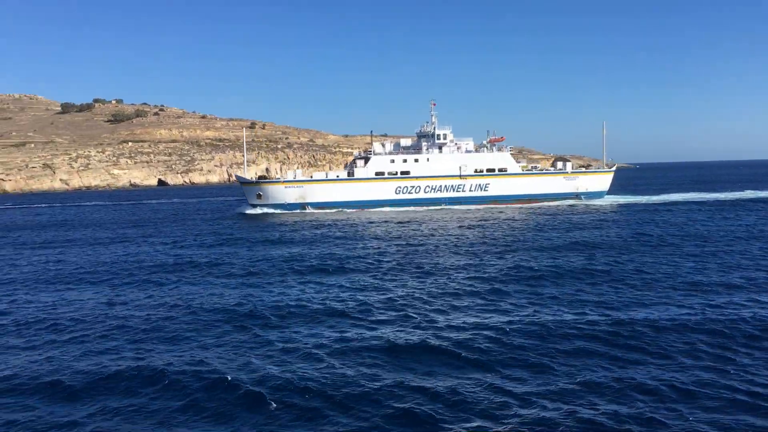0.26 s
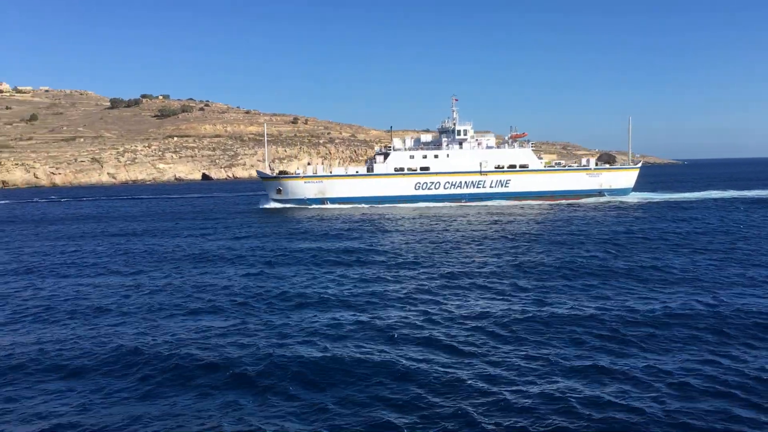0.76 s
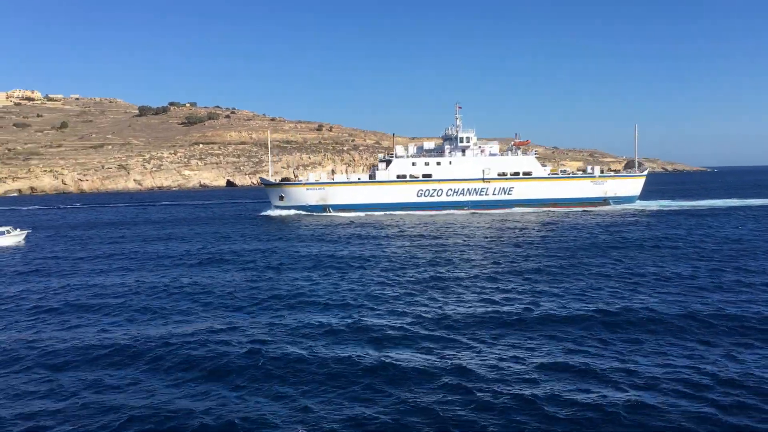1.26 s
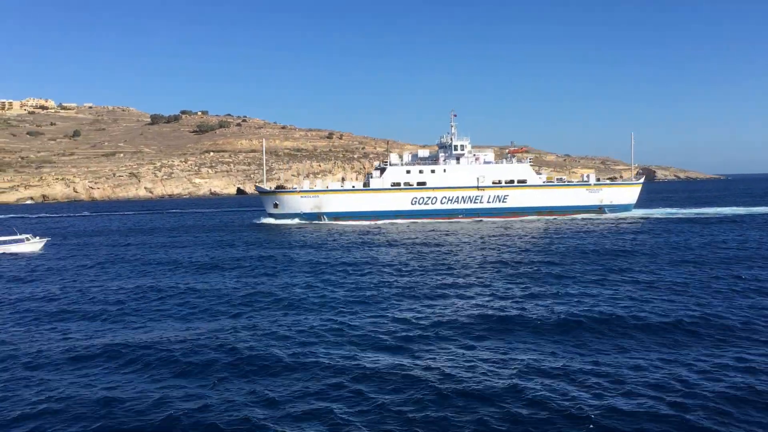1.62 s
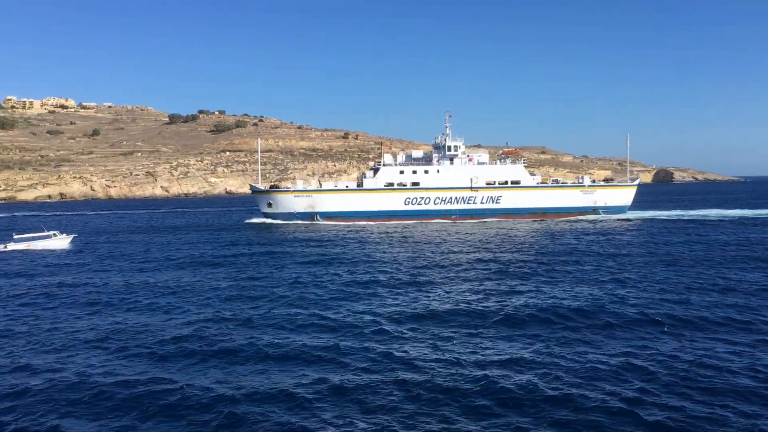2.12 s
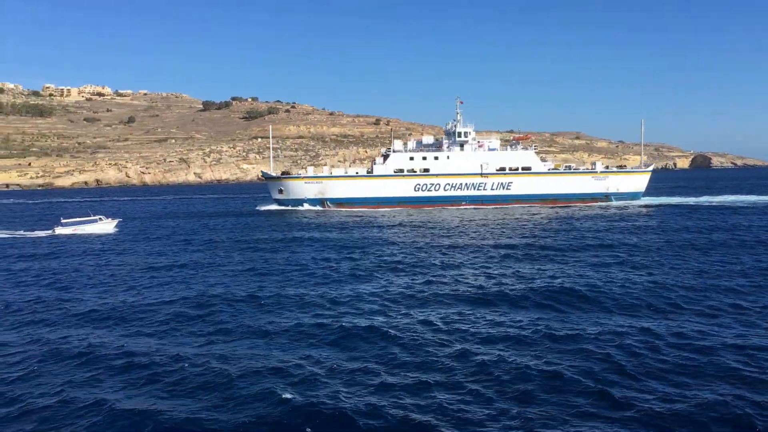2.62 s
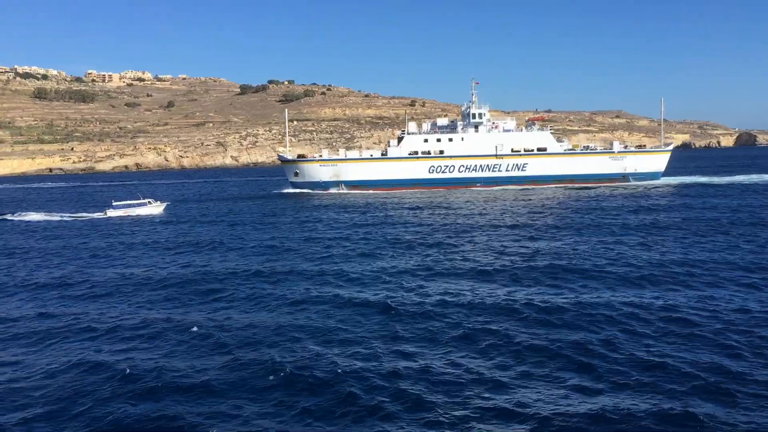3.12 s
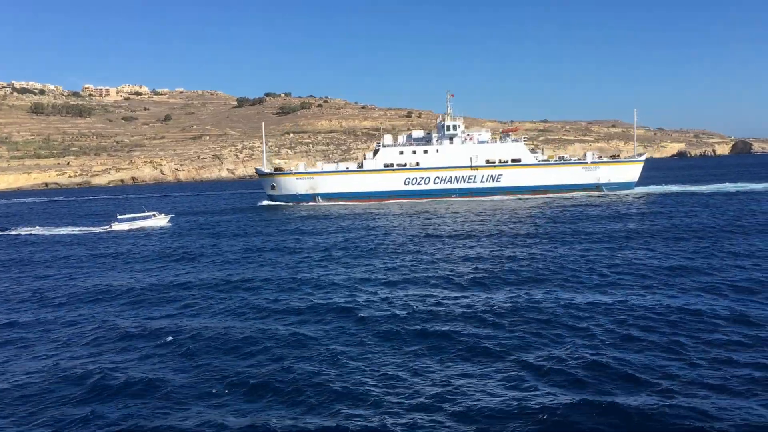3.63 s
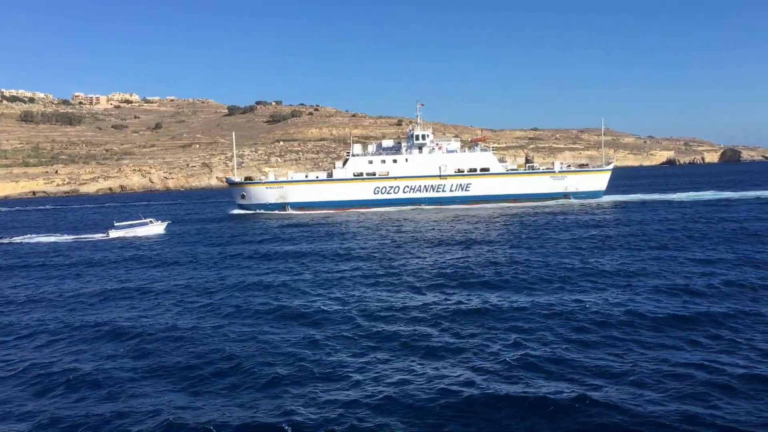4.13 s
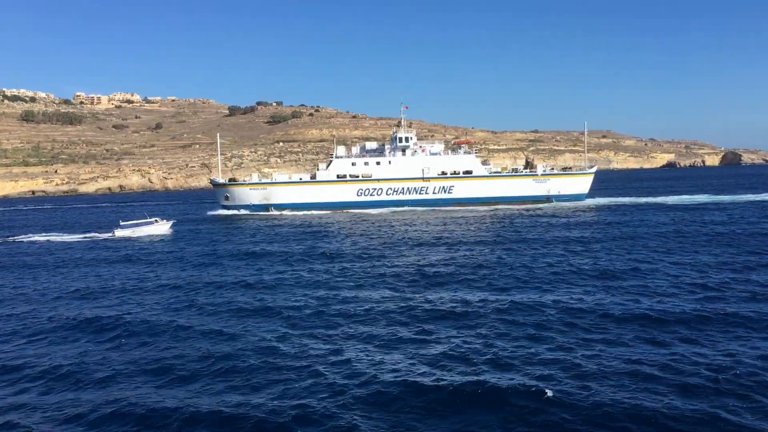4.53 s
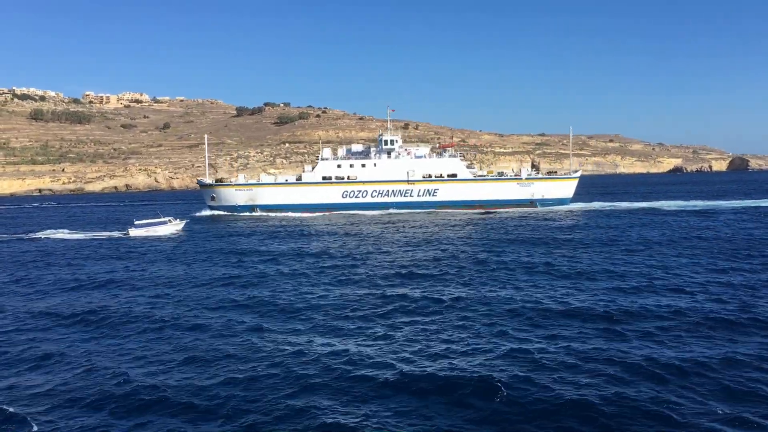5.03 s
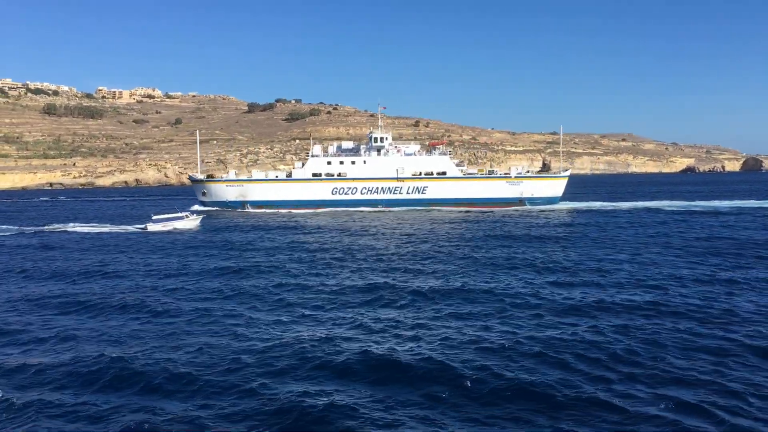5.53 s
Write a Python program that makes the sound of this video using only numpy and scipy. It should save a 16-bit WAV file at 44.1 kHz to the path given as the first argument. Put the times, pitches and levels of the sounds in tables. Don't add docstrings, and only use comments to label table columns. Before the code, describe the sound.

Heard on the open deck of a ferry, close to the rail: two big diesels drone very low, slowly beating against each other, with hull rumble and a generator hum. A loose steel panel buzzes in irregular bursts, sometimes ringing a brief thin note. Soft wash and fine spray hiss throughout. Handheld phone sound, continuous, no distinct passing boats.

```python
import sys
import numpy as np
from scipy import signal
from scipy.fft import rfft, irfft
from scipy.io import wavfile
from scipy.ndimage import uniform_filter1d, map_coordinates

SR = 44100
rng = np.random.default_rng(int(sys.argv[2]) if len(sys.argv) > 2 else 0)


def wav_record(signal):
    frames = np.transpose(np.atleast_2d(signal))
    bounded = np.clip(frames, -1, 1)
    quanta = np.round(bounded * 32767).astype(np.int16)
    wavfile.write(sys.argv[1], SR, quanta)


def natural_amplitude(level_db):
    exponent = np.asarray(level_db, float) / 20
    return 10 ** exponent


N = 254016
COARSE = 8

# time_s, first_hz, second_hz
FIRING_RATES = [(0.0, 35.266, 35.86), (0.48, 35.513, 35.641), (0.96, 35.375, 35.807),
                (1.44, 35.498, 35.713), (1.92, 35.385, 35.855), (2.4, 35.332, 35.765),
                (2.88, 35.266, 35.687), (3.36, 35.23, 35.645), (3.84, 35.189, 35.608),
                (4.32, 35.168, 35.566), (4.8, 35.111, 35.561), (5.28, 35.118, 35.461),
                (5.76, 35.205, 35.281)]
# shaft_multiple, first_db, second_db
DIESEL_ORDERS = [(3, -70, -59), (5, -49.5, -40), (6, -27, -26), (7, -56, -58), (8, -42, -47),
                 (9, -26.5, -30.5), (12, -50, -46), (13, -41, -44), (15, -40, -32), (16, -52, -44),
                 (17, -48, -39.5), (18, -38, -31.5), (19, -76, -52.5), (21, -50, -47.5), (24, -50.5, -63.5),
                 (27, -69.5, -58), (30, -97, -61), (31, -64.5, -61.5), (33, -70.5, -61), (36, -70, -68)]
# time_s, level_db, detour_m
ENGINE_PATH = [(0.0, -1, 2.64), (0.36, 0, 2.8), (0.72, 2.5, 2.31), (1.08, -1.8, 3.08), (1.44, 2.5, 3.06),
               (1.8, 1.3, 2.3), (2.16, -0.5, 2.19), (2.52, 1.3, 2.2), (2.88, -0.9, 1.1), (3.24, 0.4, 2.26),
               (3.6, -1.7, 2.68), (3.96, 1.7, 2.47), (4.32, 0.5, 1.91), (4.68, 1.0, 2.69),
               (5.04, 2.5, 1.95), (5.4, -0.1, 2.1), (5.76, 2, 2.66)]
# cycle_multiple, level_db
GENERATOR_ORDERS = [(5, -42), (6, -35), (7, -28), (8, -31.5), (11, -40.5), (13, -36), (14, -44.5),
                    (17, -38), (18, -37.5), (39, -46.5)]
# time_s, level_db
GENERATOR_LOAD = [
    (0, 1.5),
    (1.08, -0.8),
    (1.7, -4.5),
    (2.16, 1.5),
    (2.6, 1),
    (3.6, -1),
    (4.68, 0),
    (5.04, -2.5),
    (5.76, -0.5),
]
# pitch_hz, level_db
WHINE_NOTES = [(358, -52), (833, -65.5), (2071, -75), (2488, -74)]
# pitch_hz, width_hz, level_db
DECK_MODES = [(415, 20, 5), (603.4, 29, 0)]
# pitch_hz, density_db_per_hz
HULL_SPECTRUM = [(22, -78), (30, -58), (42, -55.5), (60, -46.5), (84, -54.0), (110, -50), (150, -53),
                 (170, -55.0), (215, -57.5), (240, -62.5), (290, -63.0), (335, -70), (370, -64.0),
                 (440, -71), (480, -85)][:14]
# pitch_hz, width_hz, level_db
FRAME_MODES = [(1000, 34, -6.5), (1082.6, 13, -1), (1314, 37, -11.5)]
SHEET_MODES = [(1550, 56, -2), (1607, 27, -0.5), (1668, 41, -1.5)]
RIB_MODES = [(1940, 60, 1.5), (2094, 34, -7), (2122, 95, -7.5)]
BOLT_MODES = [(3077, 130, 2), (3370, 260, 0.5), (3660, 300, -5)]
# time_s, level_db
DECK_SHAKING = [(0, -51.5), (.7, -49.5), (.82, -47.5), (1.6, -48), (1.75, -55.5), (2.1, -53), (2.28, -62),
                (2.5, -48), (2.85, -53.5), (2.92, -56), (3.3, -51.5), (3.65, -59), (4.1, -50), (4.5, -51.5),
                (4.75, -44.5), (5.0, -44), (5.1, -52), (5.76, -50)]
# level_db, share_of_shaking (about 0-1)
PANEL_PARTS = [
    (-53, 0.67),
    (-51, 1.05),
    (-57, 1),
    (-59, 0.54),
]
# centre_s, length_s, level_db, place (0 frame, 1 sheet, 2 rib, 3 bolts)
CONTACT_BOUTS = [(.16, 0.056, -42.5, 1.3), (.45, .07, -47, .05), (.75, .05, -47, .1), (.85, .05, -52, 3.0),
                 (1.21, 0.15, -49, 2.65), (1.46, 0.05, -42, .6), (1.88, .08, -50, 1.0),
                 (2.02, 0.16, -43, 1.2), (2.45, 0.043, -51, 3.0), (2.57, 0.073, -45, 1.74),
                 (2.65, 0.061, -46, 1.9), (2.73, 0.11, -43.5, 1), (2.84, .025, -43, .05),
                 (2.87, 0.021, -41, 1.5), (2.9, .03, -51, 2.9), (3.09, .18, -46, .05),
                 (3.32, 0.1, -49.5, 2.9), (3.4, 0.045, -47, .05), (3.72, .08, -52, .05),
                 (3.99, .04, -53, .3), (4.06, 0.033, -46, 1.6), (4.22, .05, -42, 0.67),
                 (4.62, .08, -45, 1.05), (4.68, 0.083, -48, 2.8), (4.73, .04, -40, 0.36),
                 (4.57, .06, -44, 1.4), (4.92, 0.13, -43, .1), (4.98, 0.072, -50, 3.0),
                 (5.16, 0.04, -42, .3), (5.72, .04, -48, 0.22)]
# pitch_hz, density_db_per_hz
WASH_SPECTRUM = [(250, -15), (430, -4.5), (524, -7.5), (585, -3.5), (749, -8.5), (811, -8.5), (1100, -8.5),
                 (1670, -13.5), (2390, -16), (2800, -18.5), (4600, -23.5), (5980, -65), (10100, -120)]
# pitch_hz, density_db_per_hz
SPRAY_SPECTRUM = [(2710, -27), (4600, -11), (4940, -2), (5880, 0), (7900, -8), (8880, -5), (10300, -11.5),
                  (13000, -4), (15100, -6), (15600, -4)]
# start_s, peak_db
CLEAR_DROPS = [
    (.5328, -43),
    (3.3591, -43),
    (4.2456, -41),
]
# centre_s, length_s, level_db, pitch_hz
SINGLE_MODES = [(0.772, 0.04, -46.7, 1600), (0.804, 0.029, -49, 2120), (0.792, 0.1, -47, 1960),
                (0.853, 0.035, -53.8, 3305), (1.007, 0.055, -52, 1565), (1.121, 0.043, -43, 1580),
                (1.186, 0.038, -48, 1960), (1.189, 0.016, -35.5, 1590), (1.272, 0.038, -48, 1572),
                (1.353, 0.036, -46.3, 1565), (1.862, 0.034, -43, 1560), (1.977, 0.028, -41.5, 1600),
                (2.022, 0.032, -46.2, 1690), (2.043, 0.033, -42.0, 1560), (2.549, 0.048, -48, 1526),
                (2.675, 0.038, -49, 1546), (2.739, 0.05, -47, 1570), (4.584, 0.032, -49.2, 1980),
                (4.621, 0.061, -47, 1715), (4.714, 0.035, -44.8, 1680), (4.779, 0.035, -47, 1946),
                (4.785, 0.084, -44, 1520), (4.822, 0.1, -47, 2003), (4.824, 0.036, -43, 1087),
                (4.82, 0.11, -57, 1981), (4.865, 0.035, -42, 1706), (4.914, 0.032, -47.7, 1938),
                (4.969, 0.073, -42.2, 1559), (4.975, 0.035, -43, 1045), (5.145, 0.02, -38, 1565)]


def level(x, db):
    return x * natural_amplitude(db) / np.sqrt(np.mean(x ** 2))


def walk(rate_hz, size=N):
    knot_count = N / SR * rate_hz
    knots = rng.standard_normal(int(knot_count) + 4)
    coarse = map_coordinates(knots, [np.linspace(0, knot_count, 4000)], order=2)
    return np.interp(np.linspace(0, 3999, size), np.arange(4000), coarse)


def curves(table):
    s, *columns = np.transpose(table)
    return [np.interp(np.arange(N) / SR, s, column) for column in columns]


def tone(turns, db, wander_db, wander_turns):
    turns = turns[::COARSE]
    size = 2 ** .5 * natural_amplitude(db + wander_db * walk(4.06, size=len(turns)))
    phase = turns + wander_turns * walk(5, size=len(turns))
    return size * np.cos(2 * np.pi * phase)


def noise(spectrum, swell_db, flicker_db, flicker_hz):
    hz, db = np.transpose(spectrum)
    octave = np.log2(np.fft.rfftfreq(N, 1 / SR) + 1e-9)
    density = natural_amplitude(np.interp(octave, np.log2(hz), db, -200, -200))
    shaped = density * rfft(rng.standard_normal(N)) * (SR / 2) ** .5
    out, swell = 0, walk(0.54)
    for centre in np.arange(np.log2(hz[0]), np.log2(hz[-1]) + .5, .5):
        band = irfft(shaped * np.clip(1 - 2 * abs(octave - centre), 0, 1), N)
        out = out + band * natural_amplitude(swell_db * swell + flicker_db * walk(flicker_hz))
    return out


def ring(drive, modes):
    out = 0
    for k, (hz, width_hz, db) in enumerate(modes):
        mode = signal.lfilter(*signal.iirpeak(hz, hz / width_hz, SR), drive)
        out = out + (-1) ** k * natural_amplitude(db) * mode
    return out


def diesels(first, second):
    lag_turns, path_turns, echo_db, sound_speed_m_s = .617, .146, -7.5, 343
    direct = 0
    for order, first_db, second_db in DIESEL_ORDERS:
        k, start = order / 3, rng.random()
        first_turns = k * first + start
        second_turns = k * (second + lag_turns) + start + path_turns
        direct = direct + tone(first_turns, first_db, wander_db=0.75, wander_turns=0.022)
        direct = direct + tone(second_turns, second_db, wander_db=0.87, wander_turns=0.02)
    path_db, detour_m = (column[::COARSE] for column in curves(ENGINE_PATH))
    t = np.arange(len(direct)) * COARSE / SR
    echo = np.interp(t - detour_m / sound_speed_m_s, t, direct)
    return natural_amplitude(path_db) * (direct + natural_amplitude(echo_db) * echo)


def generator():
    cycle_hz = 7.466
    turns = cycle_hz * np.arange(N) / SR
    hum = 0
    for order, db in GENERATOR_ORDERS:
        hum = hum + tone(order * turns + rng.random(), db, wander_db=0.3, wander_turns=0.053)
    return hum * natural_amplitude(curves(GENERATOR_LOAD)[0][::COARSE])


def propeller():
    blade_hz, blade_db = 34.8, -44
    return tone(blade_hz * np.arange(N) / SR, blade_db, wander_db=2.5, wander_turns=.05)


def whine():
    t = np.arange(N) / SR
    return sum(tone(hz * t, db, wander_db=1.0, wander_turns=0.22) for hz, db in WHINE_NOTES)


def deck():
    drone = level(ring(rng.standard_normal(N), DECK_MODES), -50.5)
    return natural_amplitude(3.5 * walk(2.94)) * drone


def hull_rumble():
    return noise(HULL_SPECTRUM, swell_db=3.8, flicker_db=1.1, flicker_hz=5.6)


def contact(place):
    middle_db, flutter_db, flutter_hz = -51.5, 2, 14
    spread_db = 13.5
    part_db, share = PANEL_PARTS[place]
    shake_db = curves(DECK_SHAKING)[0][::COARSE]
    flutter = flutter_db * walk(flutter_hz, size=len(shake_db))
    power = natural_amplitude(part_db + share * (shake_db - middle_db) + flutter) ** 2
    t = np.arange(len(shake_db)) * COARSE / SR
    for s, length_s, db, where in CONTACT_BOUTS:
        bout_power = natural_amplitude(db - spread_db * abs(place - where)) ** 2
        power = power + bout_power * np.exp(-(2 * (t - s) / length_s) ** 2)
    return np.interp(np.arange(N) / SR, t, np.sqrt(power))


def panel(first, second):
    jolt = 1 + .7 * np.exp(-(first % 1) / .3) + .5 * np.exp(-(second % 1) / .3)
    jolt = jolt * (1 + .15 * np.cos(2 * np.pi * first / 3))
    out = 0
    for place, modes in enumerate((FRAME_MODES, SHEET_MODES, RIB_MODES, BOLT_MODES)):
        ringing = ring(jolt * rng.standard_normal(N), modes)
        steady = ringing / uniform_filter1d(ringing ** 2, 1600) ** .38
        out = out + contact(place) * level(steady, 0)
    return out


def wash():
    return level(noise(WASH_SPECTRUM, swell_db=0.32, flicker_db=0.95, flicker_hz=9), -42.5)


def spray():
    spectrum = SPRAY_SPECTRUM + [(21000, -14.0)]
    return level(noise(spectrum, swell_db=-0.94, flicker_db=0.5, flicker_hz=9.2), -55)


def drops():
    struck = rng.random(N) < 150 / SR
    ticks = struck * natural_amplitude(-51 + 2.2 * rng.exponential(size=N)) * rng.choice([-1, 1], N)
    s, db = np.transpose(CLEAR_DROPS)
    ticks[(s * SR).astype(int)] = 2 * natural_amplitude(db)
    band = signal.butter(2, [6500, 15000], "band", fs=SR, output="sos")
    return signal.sosfilt(band, ticks)


def pings():
    t = np.arange(0, N, COARSE) / SR
    wobble_turns = 0.11 * walk(40, size=len(t))
    out = 0
    for s, length_s, db, hz in SINGLE_MODES:
        if hz < .45 * SR / COARSE:
            envelope = natural_amplitude(db - 1) * 2 ** .5 * np.exp(-2 * ((t - s) / length_s) ** 2)
            out = out + envelope * np.sin(2 * np.pi * (hz * (t - s) + wobble_turns))
    return out


def machinery(first, second):
    tones = diesels(first, second) + generator() + propeller() + whine() + pings()
    return signal.resample_poly(tones, COARSE, 1, padtype="edge")[:N]


def scene():
    first, second = (np.cumsum(hz) / SR for hz in curves(FIRING_RATES))
    engines = machinery(first, second) + deck()
    steel = hull_rumble() + panel(first, second)
    water = wash() + spray() + drops()
    return (engines + steel + water)[None]


def top_cut(x):
    return signal.sosfilt(signal.butter(12, 15710, fs=SR, output="sos"), x)


def record(dry):
    fade_s = .0015
    t = np.arange(N) / SR
    mix = dry * np.clip(np.minimum(t, t[::-1]) / fade_s, 0, 1)
    return top_cut(mix)


dry = scene()
out = record(dry)
wav_record(out)
```